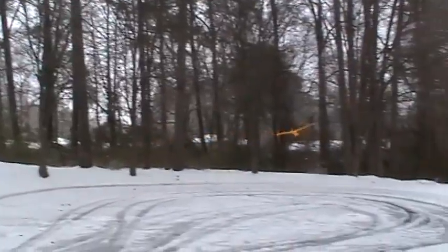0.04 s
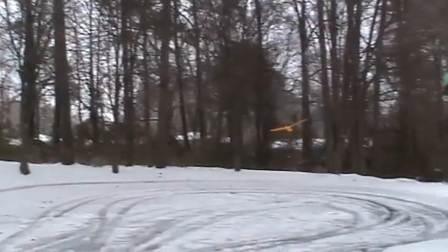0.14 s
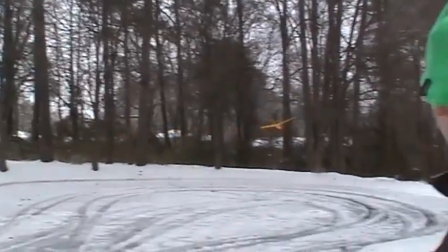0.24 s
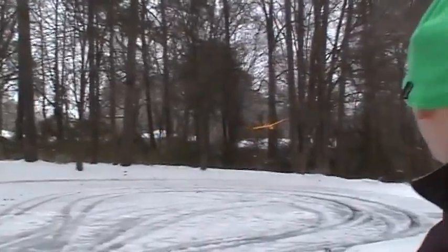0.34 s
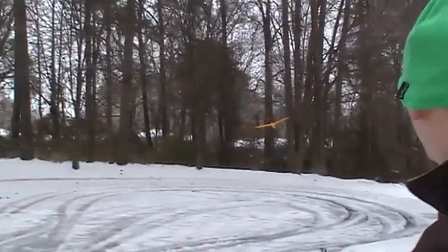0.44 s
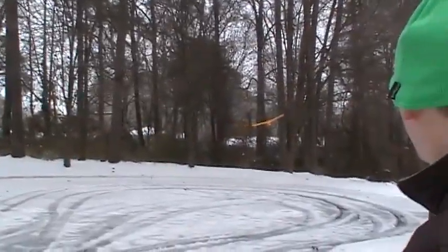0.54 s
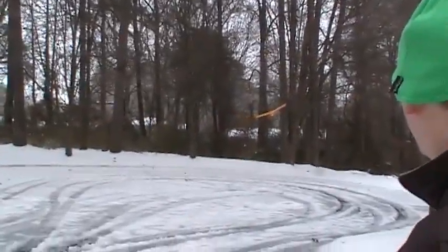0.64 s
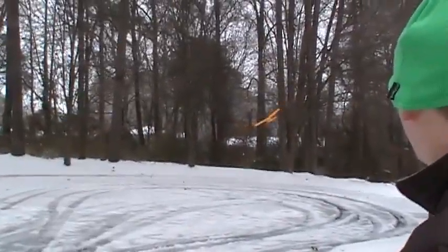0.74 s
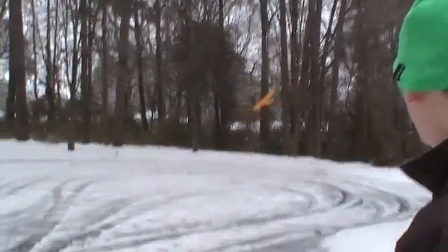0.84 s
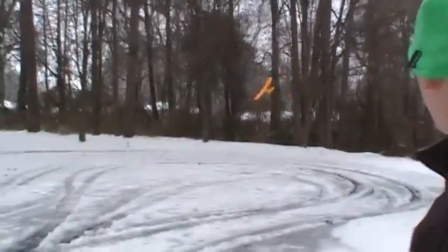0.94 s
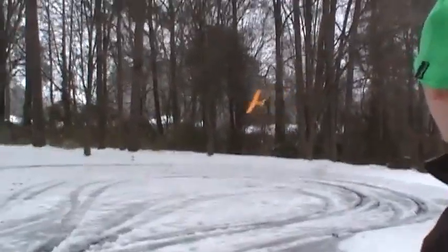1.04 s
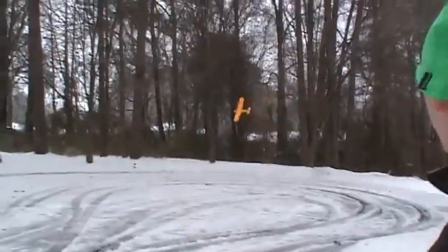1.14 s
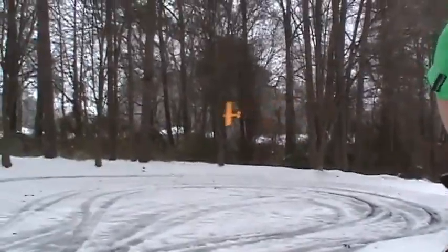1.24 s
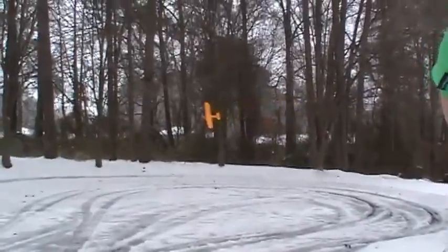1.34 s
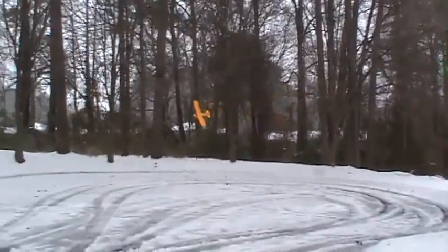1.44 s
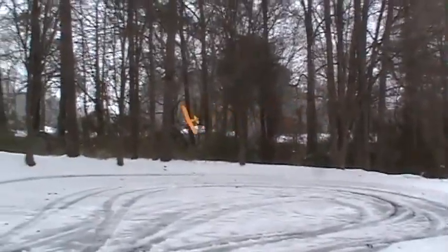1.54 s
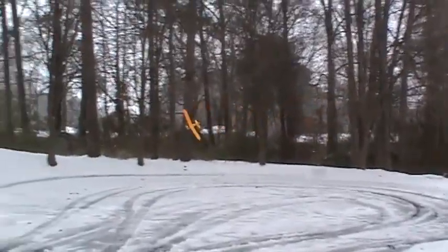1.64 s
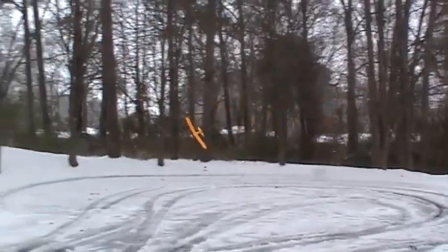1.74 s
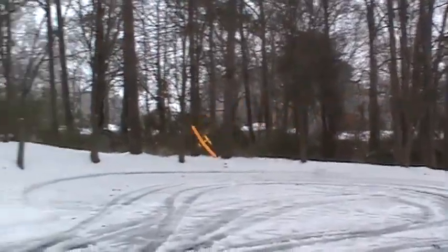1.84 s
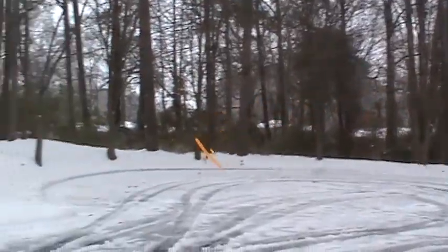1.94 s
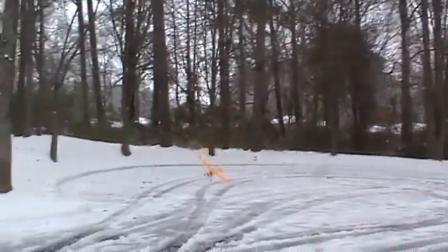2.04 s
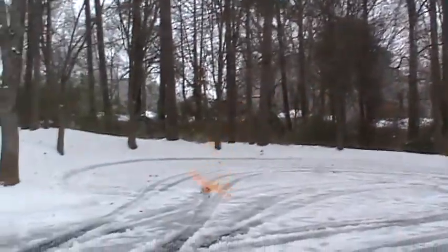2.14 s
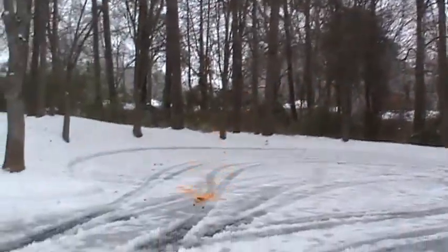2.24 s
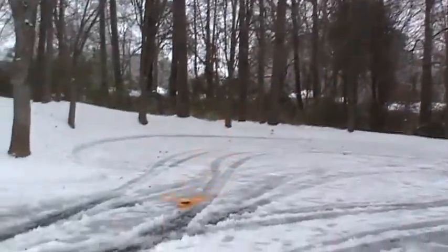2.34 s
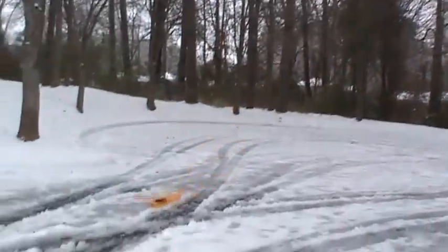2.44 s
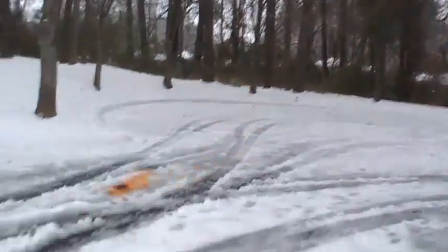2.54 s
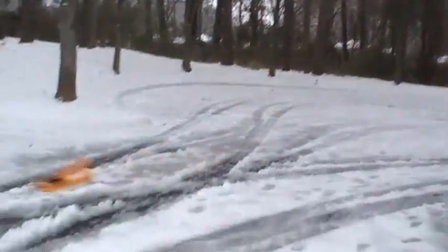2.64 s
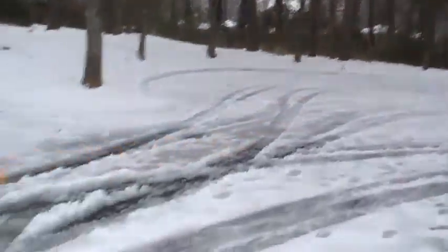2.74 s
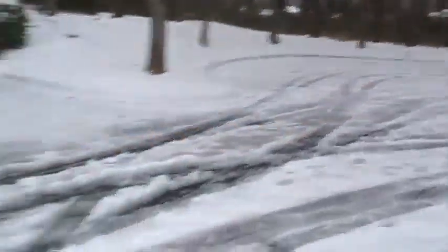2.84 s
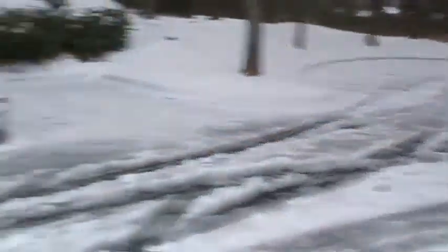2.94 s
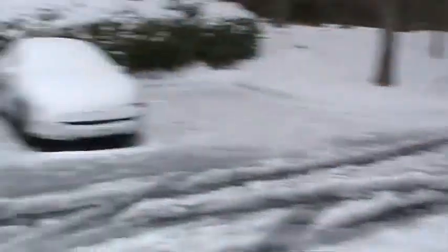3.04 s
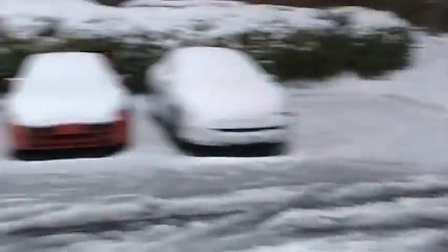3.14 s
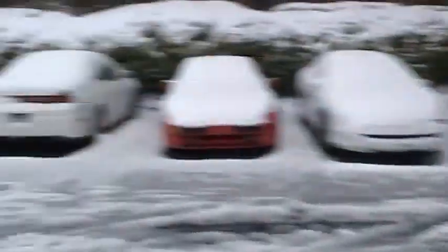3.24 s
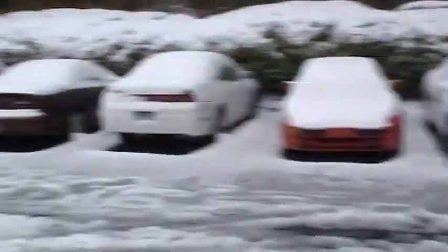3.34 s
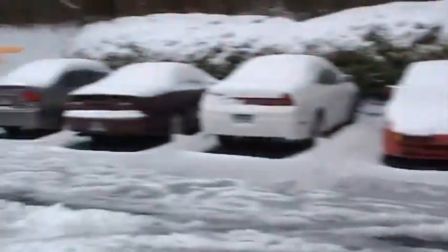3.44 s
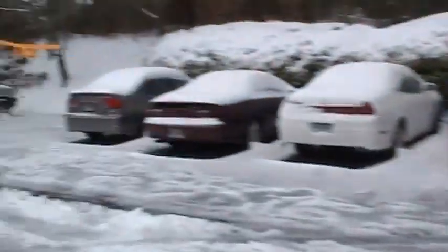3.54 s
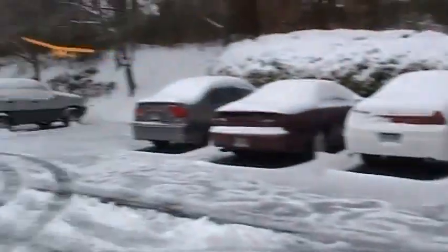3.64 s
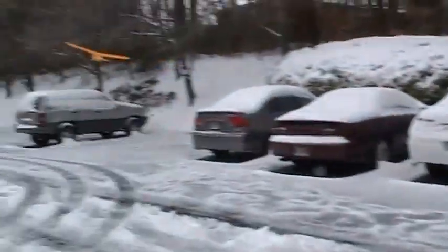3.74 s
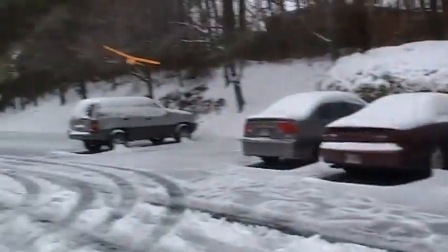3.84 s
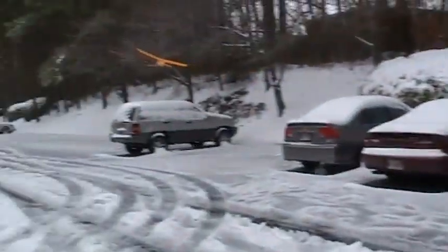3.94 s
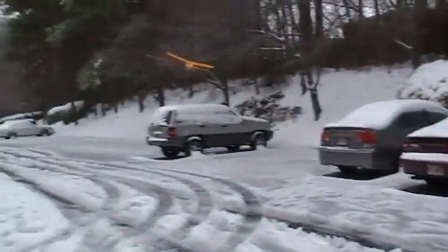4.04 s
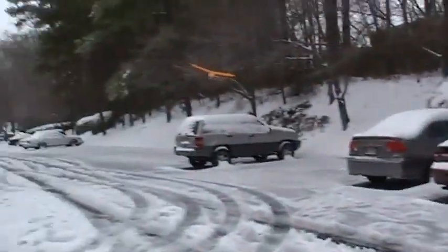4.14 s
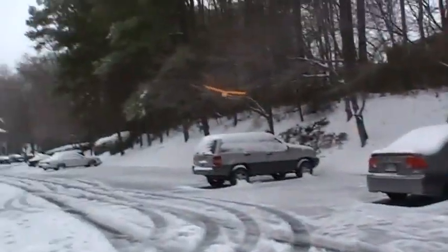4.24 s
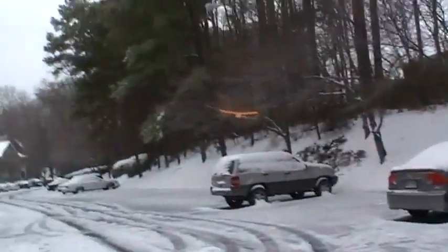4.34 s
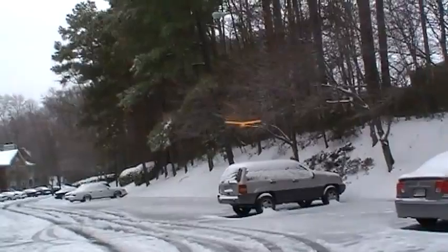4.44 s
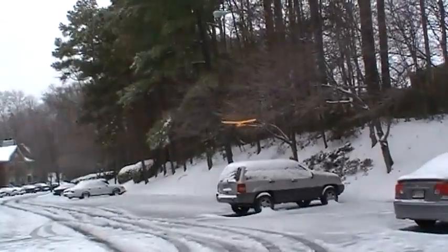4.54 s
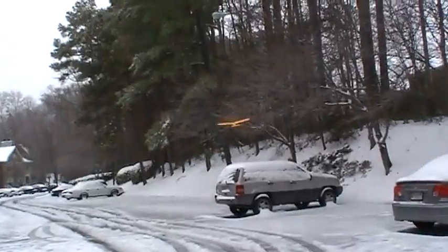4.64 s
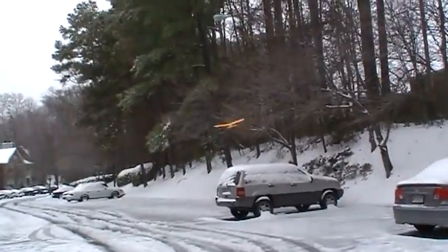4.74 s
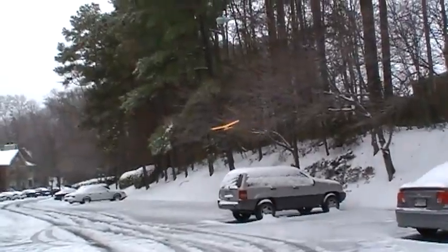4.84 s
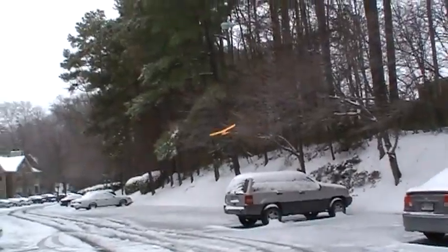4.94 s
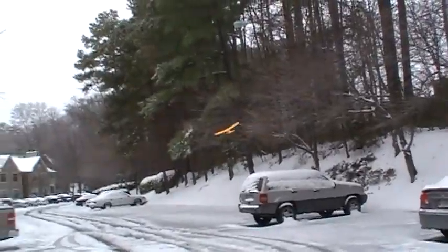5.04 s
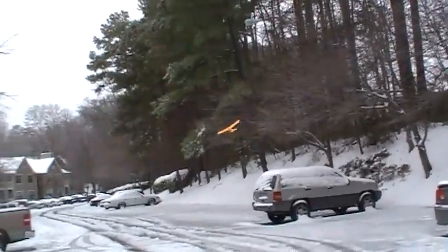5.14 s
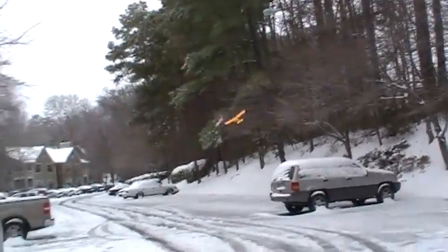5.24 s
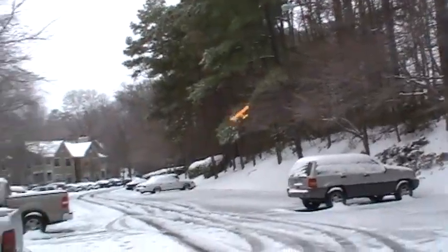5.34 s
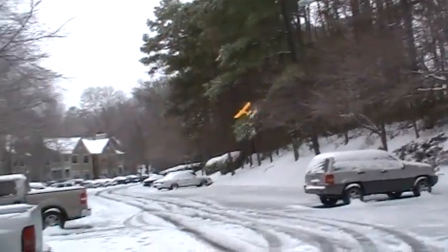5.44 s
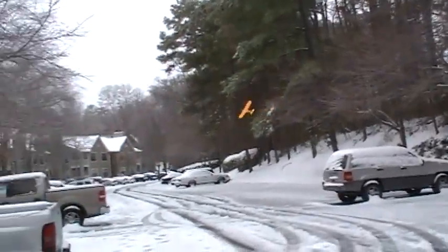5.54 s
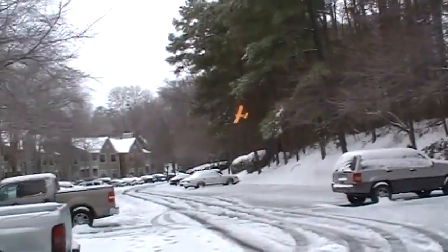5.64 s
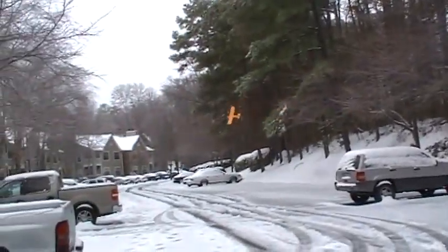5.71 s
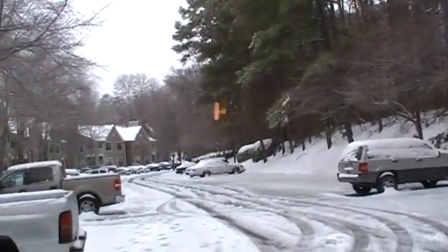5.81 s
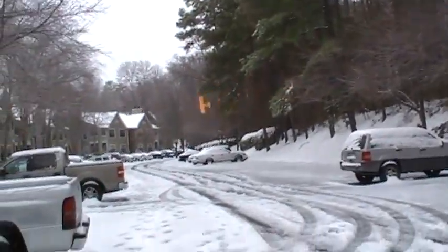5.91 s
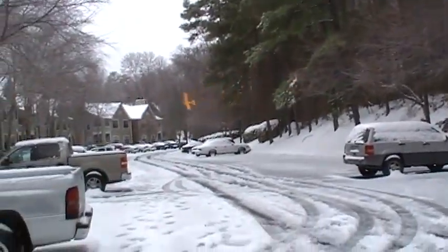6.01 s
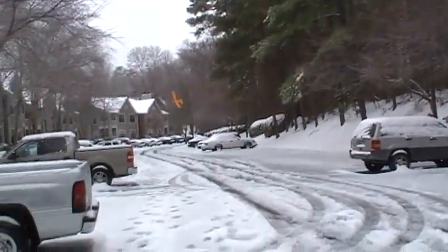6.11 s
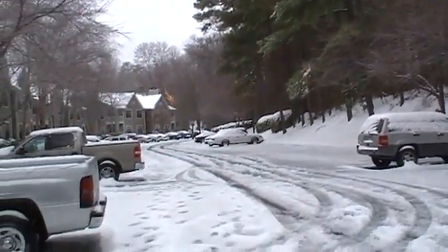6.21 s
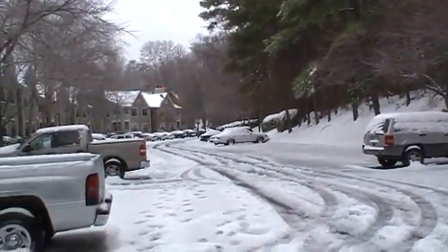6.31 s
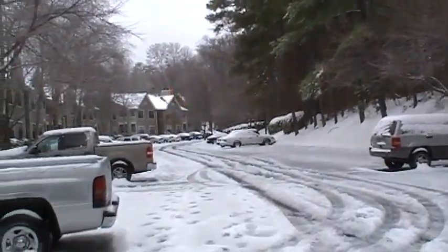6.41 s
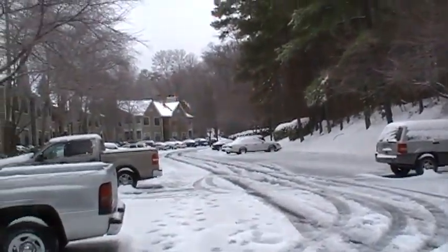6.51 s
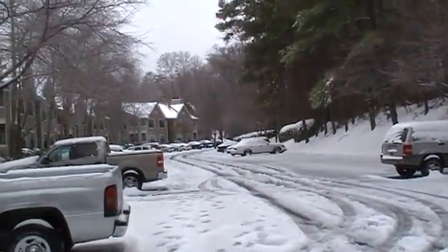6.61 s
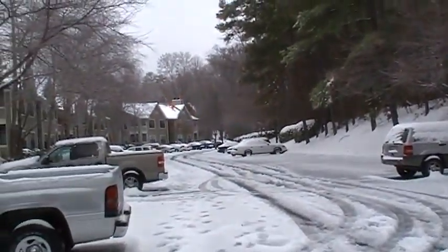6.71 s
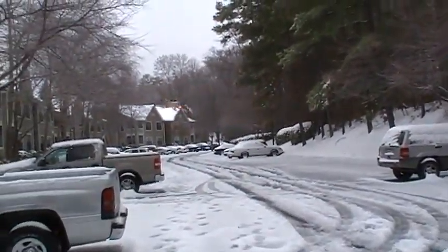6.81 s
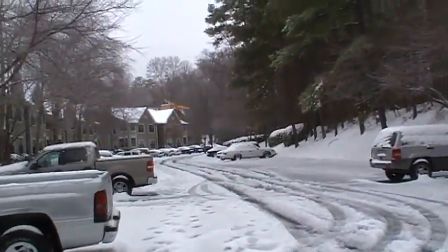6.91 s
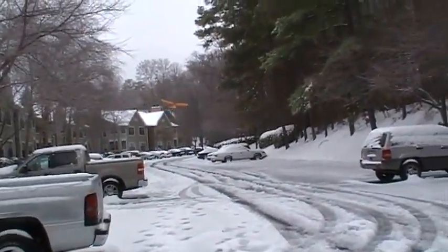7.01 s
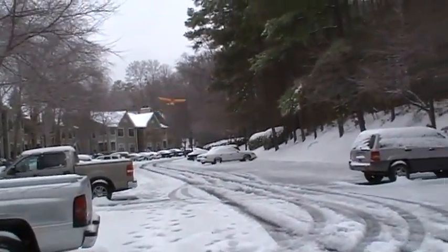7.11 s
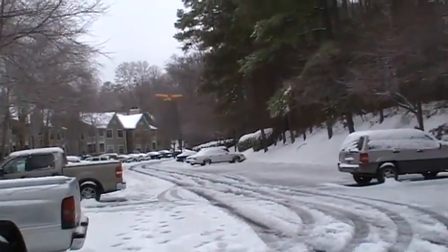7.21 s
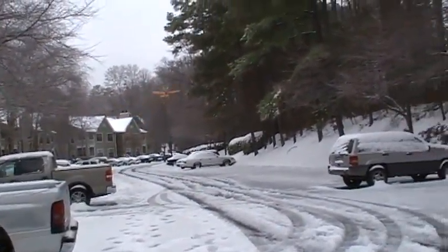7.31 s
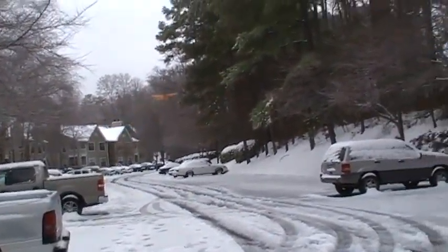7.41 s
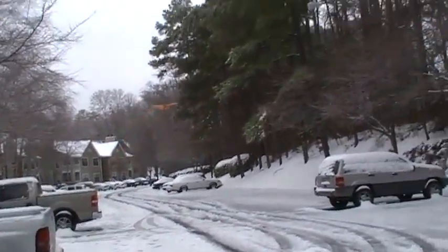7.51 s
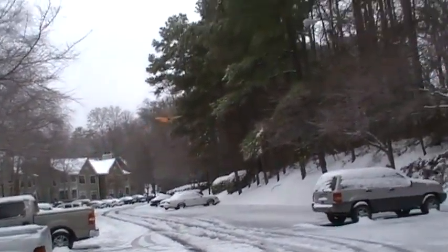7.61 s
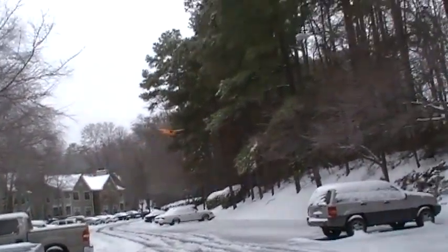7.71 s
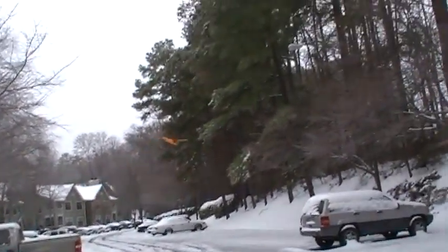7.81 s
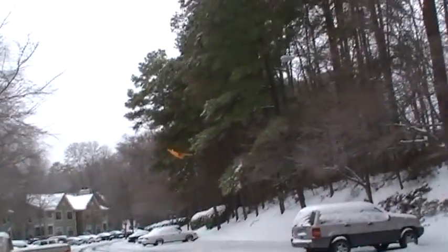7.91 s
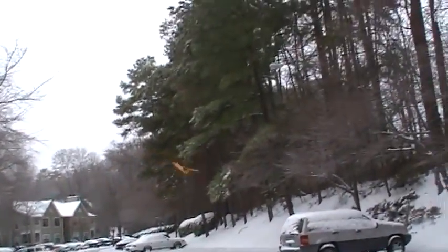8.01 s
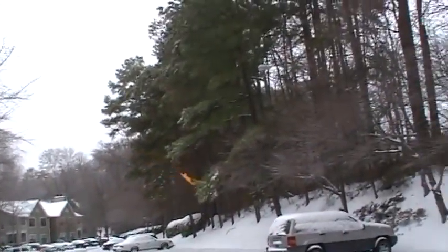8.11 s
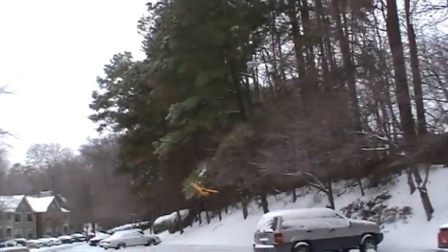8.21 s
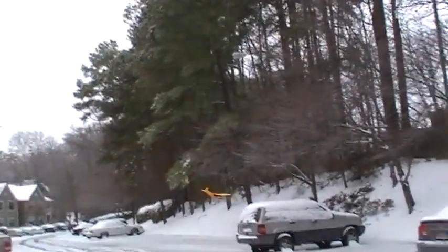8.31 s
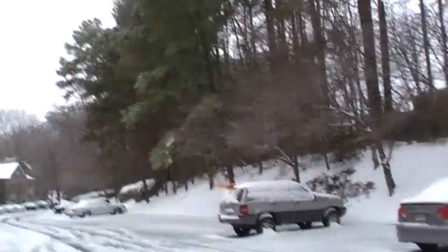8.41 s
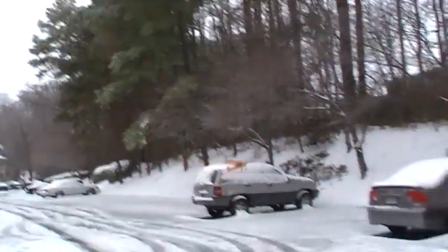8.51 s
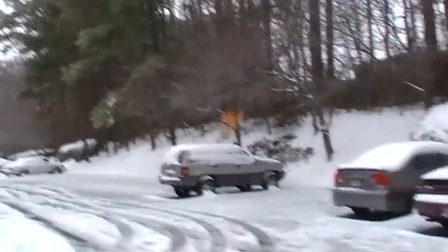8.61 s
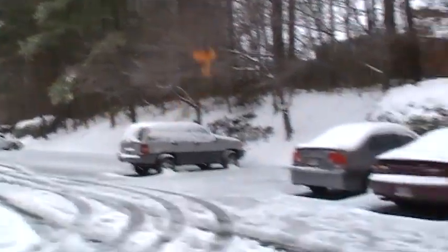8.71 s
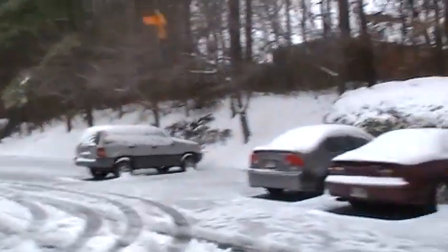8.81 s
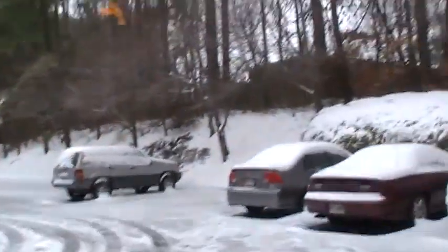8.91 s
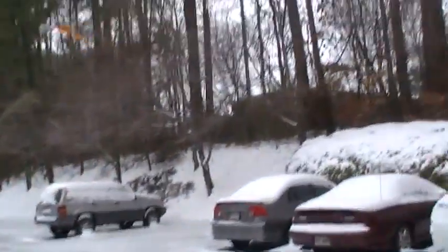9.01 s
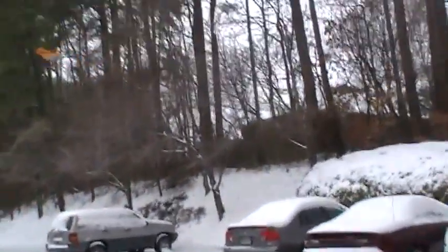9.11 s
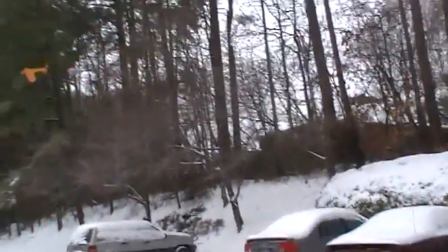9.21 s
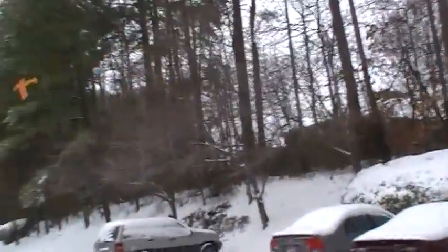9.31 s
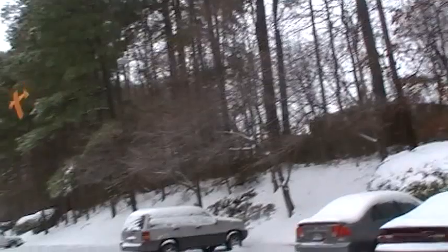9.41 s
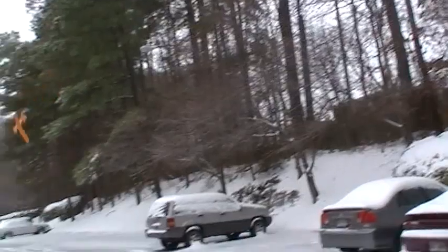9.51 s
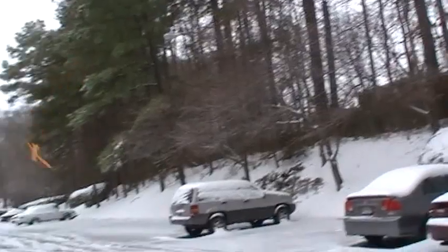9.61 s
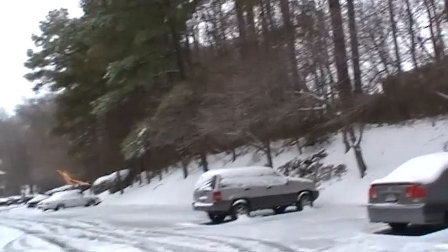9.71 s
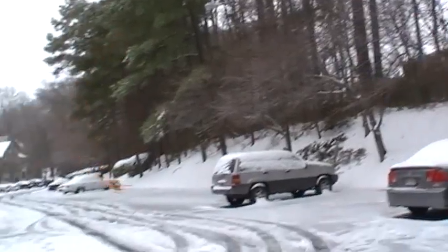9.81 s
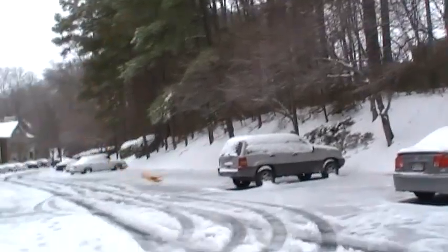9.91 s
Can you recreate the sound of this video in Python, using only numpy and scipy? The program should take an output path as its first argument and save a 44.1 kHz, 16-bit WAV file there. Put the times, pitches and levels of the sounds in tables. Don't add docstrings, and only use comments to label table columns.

```python
import sys
import numpy as np
from scipy import signal
from scipy.fft import rfft, irfft, next_fast_len
from scipy.io import wavfile
from scipy.ndimage import uniform_filter1d, map_coordinates

SR = 44100
rng = np.random.default_rng(int(sys.argv[2]) if len(sys.argv) > 2 else 0)


def store_wav(level_fs):
    pcm = np.round(np.clip(np.atleast_2d(level_fs), -1, 1) * 32767)
    wavfile.write(sys.argv[1], SR, pcm.T.astype(np.int16))


def elevation(decibels):
    levels = np.asarray(decibels, float)
    return 10 ** (levels / 20)


N = 439236


def unit(x):
    return x / np.sqrt(np.mean(x ** 2) + 1e-20)


def along(points, hz):
    f, v = np.transpose(points)
    return np.interp(np.log(hz + 1), np.log(f + 1), v)


def curves(rows):
    s, *cols = np.transpose(rows)
    return [np.interp(np.arange(N) / SR, s, c) for c in cols]


def swells(rows):
    s, half, *heights = np.transpose(rows)
    t = np.arange(0, N / SR + .01, .01)
    bells = np.exp(-((t[:, None] - s) / half) ** 2)
    return curves(np.column_stack([t, bells @ np.transpose(heights)]))


def wobble(rate):
    knots = rng.standard_normal(int(N * rate / SR) + 4)
    return map_coordinates(knots, [np.arange(N) * rate / SR], order=1)


def filtered(x, response):
    m = next_fast_len(x.shape[-1] + 8192)
    return irfft(rfft(x, m) * response(np.fft.rfftfreq(m, 1 / SR)), m)[..., :x.shape[-1]]


def coloured(x, spectrum):
    return unit(filtered(x, lambda hz: elevation(along(spectrum, hz))))


def patches(shape, tall, long):
    field = uniform_filter1d(rng.standard_normal(shape), tall, axis=0)
    return unit(uniform_filter1d(uniform_filter1d(field, long, axis=1), long, axis=1))


def ring(x, centre_hz, width_hz, db):
    body = filtered(x, lambda f: 1j * f * width_hz / (centre_hz ** 2 - f * f + 1j * f * width_hz))
    return elevation(db) * body / np.abs(body).max()


# pitch_hz, level_db
TRAFFIC = [(15, -81), (25, -33), (106, -12.5), (140, -6), (213, -3.5), (438, -3), (958, -2), (1100, -7.5),
           (1400, -5.5), (3000, -11), (3900, -5.5), (6600, -120)]
# pitch_hz, likeness
TRAFFIC_ALIKE = [(60, 0.96), (200, 0.78), (500, 0.24), (2000, 0.024)]


def town():
    turn = lambda hz: np.arccos(np.clip(along(TRAFFIC_ALIKE, hz), -1, 1)) / 2
    shares = lambda hz: elevation(along(TRAFFIC, hz)) * [np.cos(turn(hz)), np.sin(turn(hz))]
    mid, side = filtered(rng.standard_normal((2, N)), shares)
    drone = unit(filtered(rng.standard_normal(N), lambda hz: 1 / (1 + ((hz - 109) / 5) ** 2)))
    hum = elevation(-53 + 0.32 * wobble(2.84)) * unit(np.array([mid + side, mid - side]))
    return hum + elevation(-70.0) * drone * elevation([[.5], [-.5]])


# pitch_hz, level_db
WIND = [(15, -30), (40, -3), (80, -1), (150, -7), (300, -25), (600, -120)]
# centre_s, half_length_s, rise_db
BREEZE_PUFFS = [
    (3.47, 0.11, 18.5),
    (3.68, 0.16, 28),
    (4.36, 0.055, 25.4),
    (4.5, 0.094, 19),
]
STILL_AIR_DB = -86.5


def breeze():
    across, each = coloured(rng.standard_normal((2, N)), WIND)
    return elevation(STILL_AIR_DB + swells(BREEZE_PUFFS)[0]) * (across * [[1.2], [-1]] + 0.18 * each)


# start_s, peak_db, centre_hz, width_hz, t60_s
FINGER_TAPS = [
    (3.85, -34, 701, 900, 0.19),
    (3.869, -36, 300, 400, 0.42),
    (5.269, -34.5, 1780, 398, 0.046),
    (5.28, -32.5, 1790, 702, 0.047),
    (5.283, -34, 503, 1200, 0.24),
]
# centre_hz, width_hz, peak_db
CLICK_MODES = [(3100, 1500, -23), (6000, 2000, -23.5), (8800, 1200, -25)]
CLICK_S, TAP_RISE_S = 4.93732, 0.0074


def taps():
    out, t = np.zeros((2, N + SR)), np.arange(SR // 6) / SR
    for s, db, centre_hz, width_hz, t60 in FINGER_TAPS:
        rub = rng.standard_normal((2, len(t))) + rng.standard_normal(len(t))
        burst = elevation(-60 * t / t60) * np.clip(t / TAP_RISE_S, 0, 1) * rub
        out[:, round(s * SR):][:, :len(t)] += ring(burst, centre_hz, width_hz, db)
    click = sum(ring(np.exp(-t * 2e4), *mode) for mode in CLICK_MODES)
    out[:, round(CLICK_S * SR):][:, :len(t)] += click
    return out[:, :N]


def trees(x):
    t = np.arange(SR // 3) / SR
    tail = rng.standard_normal((2, len(t))) * elevation(-60 * t / 0.49) * (t > .012)
    tail[:, round(.062 * SR)] += 9
    return signal.fftconvolve(x[None], tail / np.linalg.norm(tail[0]), axes=1)[:, :N]


# start_s, high_hz, low_hz, level_db, held_end_db
CALLS = [(.705, 1576, 1160, -45, -18), (1.78, 1556, 1089, -47.5, -5), (2.154, 1580, 1188, -50, -14),
         (3.08, 1434, 1086, -44, 0.5), (3.99, 1412, 960, -45, -7), (4.872, 1450, 1010, -43, -1.5),
         (6.009, 1429, 1008, -45, -1.5), (6.866, 1368, 1079, -50.5, 2), (7.242, 1533, 1147, -46, -5),
         (8.04, 1552, 1110, -44, -2.5), (9.016, 1392, 992, -47, -13), (9.394, 1434, 1046, -47.5, -5)]
# high_hz, level_db
CALL_THROAT = [(1400, 9), (1560, 3)]
# start_s, from_hz, to_hz, length_s, level_db
HIGH_CHIPS = [
    (1.626, 6640, 9040, 0.037, -34),
    (9.18, 7000, 8490, 0.025, -41),
]


def birds():
    out, t = np.zeros(N + SR), np.arange(SR // 10) / SR
    drop = np.interp(t, [0, .024, .037, .042], [0, .06, .5, 1])
    for s, high_hz, low_hz, db, end_db in CALLS:
        turn = 2 * np.pi * np.cumsum(high_hz + (low_hz - high_hz) * drop) / SR
        draws = rng.standard_normal((2, len(t[::170])))
        leaves = elevation([np.interp(t, t[::170], 3.2 * draw) for draw in draws])
        first_db = np.interp(t, [0, .008, .03, .04, .045, .062, .09],
                             [-20, -2, -1, -12, end_db - 5, end_db - 8, end_db - 60])
        second_db = np.interp(t, [0, .014, .033, .04, .046, .062, .09],
                              [-30, -10, 0, -6, end_db - 3, end_db - 7, end_db - 50])
        low = leaves[0] * elevation(first_db) * np.sin(turn)
        upper = np.sin(2 * turn) + .25 * np.sin(3 * turn)
        upper = leaves[1] * elevation(along(CALL_THROAT, high_hz) + second_db) * upper
        out[round(s * SR):][:len(t)] += elevation(db - 1.4) * (low + upper)
    for s, from_hz, to_hz, length, db in HIGH_CHIPS:
        u = np.clip(t / length, 0, 1)
        turn = 2 * np.pi * np.cumsum(from_hz + (to_hz - from_hz) * u) / SR
        out[round(s * SR):][:len(t)] += elevation(db - 0.5) * np.sin(np.pi * u) * np.sin(turn)
    return out[:N]


# centre_s, half_length_s, rise_db
SERVO_MOVES = [
    (.86, .03, 24),
    (.95, .035, 28),
    (1.04, .045, 27),
    (1.17, .03, 23),
    (1.355, .045, 30),
    (1.42, .025, 28),
]
# pitch_hz, half_width_hz, level_db
SERVO_BOX = [(3280, 170, 0), (3700, 100, -1)]
SERVO_REST_DB, SERVO_TICKS_HZ = -72, 900


def servo():
    ticks = (rng.random(N) < SERVO_TICKS_HZ / SR) * rng.standard_normal(N)
    ticks = ticks + .06 * rng.standard_normal(N)
    case = lambda f: sum(elevation(db) / (1 + 1j * (f - hz) / half_hz) ** 2 for hz, half_hz, db in SERVO_BOX)
    return elevation(SERVO_REST_DB + swells(SERVO_MOVES)[0]) * unit(filtered(ticks, case))


def banked(x):
    z = signal.stft(x, nperseg=1024)[2]
    field_db = .5 * patches(z.shape, 30, 22) + 1.1 * patches(z.shape, 5, 8)
    return signal.istft(z * elevation(field_db), nperseg=1024)[1][:N]


# pitch_hz, level_db
RUSH_SPECTRUM = [(180, -58), (300, -70), (549, -14), (683, -8), (1340, -21.5), (2470, -13.5), (3200, -2),
                 (4160, -42), (7040, -120)]
RUSH_DB, RUSH_GROWS, RUSH_MASKED, MIDDLE_DB = -6.5, 0.021, 0.11, -48


def air_rush(near_db, nose_db, turn):
    rush_db = near_db + RUSH_DB + RUSH_GROWS * (near_db - MIDDLE_DB) - RUSH_MASKED * nose_db
    chop = 1 + 0.42 * np.cos(2 * turn)
    air = elevation(0.35 * wobble(9)) * chop * banked(coloured(rng.standard_normal(N), RUSH_SPECTRUM))
    return elevation(rush_db - 2.5) * air


PINION, GEAR = 8, 34
MESH_HUMPS = [(1.04, .26), (2.03, .14), (2.9, .28)]


def rattle(teeth):
    at = np.interp(np.arange(1, int(teeth[-1])), teeth, np.arange(N))
    k, left = np.arange(len(at)), at.astype(int)
    small = rng.standard_normal(PINION)[k % PINION]
    big = rng.standard_normal(GEAR)[k % GEAR]
    size = np.tanh(.08 * small + .35 * big + .3 * small * big + .55 * rng.standard_normal(len(k)))
    knocks = np.bincount(left, size * (left + 1 - at), N + 1)
    knocks = knocks + np.bincount(left + 1, size * (at - left), N + 1)
    shake = filtered(rng.standard_normal((3, N)), lambda hz: 1 / (1 + (hz / 260) ** 4))
    humps = sum(g * unit(s) * np.cos(2 * np.pi * n * teeth) for (n, g), s in zip(MESH_HUMPS, shake))
    return unit(knocks[:N]) + humps + .95 * rng.standard_normal(N)


# centre_s, half_length_s, centre_hz, half_width_hz,
# level_db
RATTLE_FLARES = [(.8, .2, 9150, 500, 9.5), (8.1, 0.45, 11100, 1190, 5), (2.5, 0.18, 9200, 900, 2),
                 (3.007, .055, 5700, 1200, 4.5), (3.2, 0.037, 6200, 1200, 6), (3.1, .04, 4500, 2500, -3),
                 (4.4, 0.56, 9200, 400, 3.5), (5.4, .11, 8800, 700, 9), (6.6, .35, 7540, 450, 5),
                 (7.95, 0.46, 7500, 700, 4), (8.55, .18, 7800, 499.8, 6), (8.719, .12, 4500, 700, 5)]


def flared(x):
    hz, t, z = signal.stft(x, SR, nperseg=512)
    gain_db = 0
    for s, half, mid_hz, half_hz, db in RATTLE_FLARES:
        gain_db = gain_db + db * np.exp(-((hz[:, None] - mid_hz) / half_hz) ** 2 - ((t - s) / half) ** 2)
    return signal.istft(z * elevation(gain_db), SR, nperseg=512)[1][:N]


# pitch_hz, level_db
FRAME_SPECTRUM = [(1350, -1.5), (2300, -6), (2530, -8.5), (3580, 1), (4180, 0), (4830, -4), (5280, -5.5),
                  (7110, -7), (8770, -11.5), (9980, -9.5), (12700, -22.5), (15800, -31.5)]


def airframe(near_db, nose_db, teeth):
    frame = banked(coloured(rattle(teeth), FRAME_SPECTRUM)) * elevation(0.99 * wobble(9) + 0.73 * wobble(22))
    frame = filtered(frame, lambda hz: 1 / (1 + (1500 / (hz + 1)) ** 4))
    low = filtered(frame, lambda hz: 1 / (1 + (hz / 7500) ** 8))
    sizzle = frame - low
    return flared(elevation(near_db + 2.0) * unit(low) + elevation(near_db + nose_db + 1.5) * unit(sizzle))


def lines(turn, orders, levels_db, fade_db):
    knots = np.linspace(0, N, 90)
    fades_db = [db + 4.5 + fade_db * rng.standard_normal(len(knots)) for db in levels_db]
    fades = [np.interp(np.arange(N), knots, elevation(db)) for db in fades_db]
    return sum(g * np.sin(k * turn + rng.uniform(0, 7.0)) for k, g in zip(orders, fades))


GEAR_SIDE_ORDERS = [33, 32, 31], [35, 36, 37, 38]
GEAR_SIDE_LEVELS = [0, -8, -13], [0, -5, -11, -12]
PINION_ORDERS = [29.75, 38.25, 37.25, 39.25, 40.25, 28.75, 25.5, 51]
PINION_LEVELS = [-4, -1, -7, -7, -9, -12, -14, -11]
OVERTONE_ORDERS = [42.5, 68, 67, 69, 66, 70, 63.75, 72.25, 102, 101, 97.75, 96.75]
OVERTONE_LEVELS = [-8, 1, -7, -5, -10, -11, -11, -12, -7, -8, -6, -7]
# centre_s, half_length_s, mesh_gain_db, overtone_gain_db, upper_over_lower_db
WHINE_BEAMS = [(.15, 0.28, 14, 1, -9), (.4, 0.14, 6, 3, 18), (.62, 0.11, 9, 5, 9), (1.75, 0.12, 3, 4, -22),
               (2.22, 0.21, 9, 14, -11), (2.55, 0.14, 4.5, -9, -8), (2.92, .13, 11.5, -5, -3),
               (3.2, 0.081, 0, -3, -8), (3.39, 0.15, 13.5, 13.5, -14), (3.85, 0.23, 9.5, -5, -16),
               (4.4, 0.38, 10.5, 2, -23), (5.1, 0.11, 9, 8, -10), (5.45, 0.17, 8, 7, 24),
               (6.03, 0.21, 15, -9, 0), (6.55, 0.11, 6, 4, -6), (7.06, 0.048, 9, -3, -7),
               (7.27, 0.21, 11, 1, -16), (7.62, 0.26, 13, 12, -1), (8.33, 0.12, 10.5, 10, 4),
               (8.62, 0.13, 16.5, 8, 10), (8.88, 0.088, 15.5, -17, 9), (9.1, 0.11, 9, 10, 6),
               (9.34, 0.12, 15.5, -1, 2), (9.75, 0.3, 8.5, 1, -12)]
# time_s, level_db
GEAR_RUNOUT = [(0, -5), (2.6, -3), (3, 0), (3.7, -4), (5.6, -3), (6.5, 5), (7.7, 2), (8.45, 0), (8.65, 7),
               (9.96, 5)]
MESH_DB, OVER_DB, SIDES_DB = -9, -14.5, -22
SIDES_SHARE = .55


def gear_whine(near_db, pinion_wobble_db, turn):
    beam_db, over_beam_db, lean_db = swells(WHINE_BEAMS)
    mesh_db = near_db + MESH_DB + beam_db
    over_db = near_db + OVER_DB + over_beam_db
    sides_db = near_db + SIDES_DB + curves(GEAR_RUNOUT)[0] + SIDES_SHARE * beam_db
    sides_db = sides_db + [[-.5], [.5]] * lean_db
    pinion_db = near_db + pinion_wobble_db
    whine = elevation(mesh_db + 4 + 1.6 * wobble(25))
    whine = whine * (1 + .3 * wobble(300)) * np.sin(GEAR * turn + .3 * wobble(300))
    for side_db, orders, levels_db in zip(sides_db, GEAR_SIDE_ORDERS, GEAR_SIDE_LEVELS):
        whine += elevation(side_db + 1 + 2 * wobble(30)) * lines(turn, orders, levels_db, fade_db=2)
    pinion_gain = elevation(pinion_db - 14 + 1.5 * wobble(20))
    whine += pinion_gain * lines(turn, PINION_ORDERS, PINION_LEVELS, fade_db=3)
    over_gain = elevation(over_db - 5.5 + 1.5 * wobble(20))
    whine += over_gain * lines(turn, OVERTONE_ORDERS, OVERTONE_LEVELS, fade_db=2.5)
    return filtered(whine, lambda hz: 1 / (1 + (hz / 10500) ** 8))


def glints(turn, rows):
    s, half, order, db = np.transpose(rows)
    t = np.arange(0, N / SR + .01, .01)
    power = elevation(2 * db) * np.exp(-2 * ((t[:, None] - s) / half) ** 2)
    out = np.zeros(N)
    for k in np.unique(order):
        flutter = elevation(3 * np.interp(t, t[::2], rng.standard_normal(len(t[::2]))) - 1)
        size = flutter * np.sqrt(2 * power[:, order == k].sum(axis=1))
        out += np.interp(np.arange(N) / SR, t, size) * np.sin(k * turn + rng.uniform(0, 2 * np.pi))
    return out


# centre_s, half_length_s, shaft_order, level_db
GLINTS_LOW = [(0.4, 0.65, 19.25, -70), (0.93, 0.16, 21.25, -61), (1.25, 0.65, 15.25, -71),
              (1.3, 0.2, 23.0, -61), (1.3, 0.65, 22.0, -67), (1.06, 0.09, 20, -61), (1.45, 0.65, 11.5, -70),
              (2.65, 0.65, 9.25, -64), (2.7, 0.65, 6.25, -61), (3.22, 0.08, 14.75, -57),
              (2.75, 0.65, 4.25, -64), (2.85, 0.22, 22.0, -56), (2.85, 0.65, 22.0, -55),
              (3.1, 0.4, 8.5, -62), (2.98, 0.1, 14.75, -55), (3.25, 0.65, 3.0, -66), (3.4, 0.65, 6.25, -62),
              (3.5, 0.65, 18.0, -58), (4.45, 0.65, 18.0, -70), (5.75, 0.65, 10.0, -70),
              (5.85, 0.65, 15.0, -71), (7.95, 0.65, 12.75, -68), (8.45, 0.65, 13.75, -65),
              (8.5, 0.22, 11.5, -62), (8.5, 0.65, 4.25, -67), (8.5, 0.65, 14.75, -65),
              (8.55, 0.65, 11.5, -62), (8.65, 0.65, 6.0, -64), (8.65, 0.65, 25.5, -62),
              (8.9, 0.65, 19.0, -65)]
# centre_s, half_length_s, shaft_order, level_db
GLINTS_SIDE = [(0.2, 0.15, 33, -56), (0.52, 0.32, 35, -52), (1.12, 0.32, 36, -60), (1.36, 0.32, 33, -60),
               (2.56, 0.32, 33, -50), (2.96, 0.22, 36, -44), (3.04, 0.32, 35, -43), (3.04, 0.32, 38, -50),
               (3.32, 0.15, 37, -49), (3.44, 0.32, 33, -46), (3.48, 0.1, 32, -52), (3.52, 0.1, 38, -50),
               (3.64, 0.32, 31, -54), (4.28, 0.32, 33, -56), (5.04, 0.32, 33, -60), (5.4, 0.22, 35, -57),
               (5.68, 0.22, 36, -60), (6.24, 0.32, 35, -56), (6.4, 0.32, 38, -59), (6.56, 0.32, 33, -55),
               (7.56, 0.32, 33, -50), (7.6, 0.32, 35, -56), (7.92, 0.1, 38, -53), (8.28, 0.1, 35, -49),
               (8.52, 0.32, 33, -48), (8.56, 0.32, 32, -49), (8.6, 0.32, 37, -57), (8.86, 0.06, 33, -40),
               (8.72, 0.08, 36, -45), (8.9, 0.16, 35, -41), (9.08, 0.32, 33, -43), (9.44, 0.15, 35, -51),
               (9.72, 0.32, 33, -51)]
# centre_s, half_length_s, shaft_order, level_db
GLINTS_PINION = [(0.96, 0.32, 42.5, -58), (1.88, 0.32, 42.5, -60), (2.72, 0.15, 39.25, -49),
                 (2.84, 0.07, 40.25, -47), (2.88, 0.1, 42.5, -45), (2.96, 0.07, 38.25, -46),
                 (2.96, 0.32, 29.75, -49), (3.08, 0.22, 43.5, -50), (3.24, 0.32, 38.25, -44),
                 (3.24, 0.32, 42.5, -43), (3.28, 0.15, 40.25, -49), (3.36, 0.1, 37.25, -47),
                 (3.36, 0.15, 39.25, -45), (3.44, 0.07, 42.5, -50), (3.88, 0.32, 38.25, -57),
                 (4.08, 0.32, 42.5, -59), (5.36, 0.1, 39.25, -55), (5.48, 0.22, 38.25, -54),
                 (5.6, 0.24, 29.75, -58), (6.24, 0.15, 29.75, -58), (6.44, 0.32, 38.25, -55),
                 (7.56, 0.32, 37.25, -58), (7.64, 0.32, 39.25, -59), (7.84, 0.32, 42.5, -59),
                 (7.88, 0.1, 40.25, -52), (7.88, 0.32, 29.75, -58), (7.96, 0.22, 38.25, -55),
                 (8.24, 0.1, 37.25, -51), (8.44, 0.1, 38.25, -53), (9.04, 0.32, 29.75, -54),
                 (9.12, 0.32, 42.5, -57), (9.28, 0.32, 40.25, -59), (9.32, 0.32, 38.25, -55)]
# centre_s, half_length_s, shaft_order, level_db
GLINTS_HIGH = [(0.55, 0.65, 67.0, -66), (0.55, 0.65, 69.0, -61), (0.65, 0.65, 68.0, -59),
               (0.75, 0.65, 102.0, -66), (1.2, 0.65, 70.0, -67), (1.5, 0.65, 98.75, -67),
               (1.55, 0.65, 56.0, -65), (1.55, 0.65, 66.0, -66), (2.2, 0.65, 68.0, -59),
               (2.25, 0.65, 107.25, -60), (2.35, 0.65, 69.0, -61), (2.4, 0.65, 67.0, -58),
               (2.9, 0.65, 68.0, -45), (2.95, 0.65, 69.0, -50), (3.0, 0.65, 102.0, -52),
               (3.05, 0.65, 54.0, -56), (3.1, 0.65, 51.0, -55), (3.3, 0.65, 101.0, -55),
               (3.35, 0.65, 73.25, -57), (3.35, 0.65, 97.75, -55), (3.45, 0.65, 68.0, -54),
               (3.45, 0.65, 80.75, -60), (3.65, 0.65, 63.75, -60), (3.7, 0.65, 103.0, -62),
               (4.25, 0.65, 96.75, -61), (4.6, 0.65, 63.75, -68), (4.7, 0.65, 80.75, -66),
               (4.7, 0.65, 97.75, -62), (5.0, 0.65, 72.25, -69), (5.05, 0.65, 101.0, -68),
               (5.1, 0.65, 102.0, -66), (5.15, 0.65, 96.75, -67), (5.2, 0.65, 103.0, -64),
               (5.35, 0.22, 103.0, -64), (6.45, 0.65, 99.0, -67), (6.65, 0.65, 75.25, -67),
               (6.7, 0.65, 101.0, -68), (6.8, 0.65, 68.0, -65), (7.5, 0.65, 96.75, -64),
               (8.5, 0.25, 68.0, -59), (8.85, 0.65, 103.0, -63), (8.95, 0.65, 69.0, -62),
               (9.0, 0.65, 67.0, -62)]
GLINT_LEVELS = [0.97, -0.49, -0.23, 1]


def panel_glints(turn):
    groups = (GLINTS_LOW, GLINTS_SIDE, GLINTS_PINION, GLINTS_HIGH)
    return sum(elevation(db) * glints(turn, rows) for db, rows in zip(GLINT_LEVELS, groups))


# time_s, mesh_hz
MOTOR_SPEED = [(0, 2820), (.22, 2933), (.5, 2951), (1.2, 2938), (1.5, 2951), (1.98, 3081), (2.62, 3115),
               (3.55, 3208), (4.68, 3224), (5.55, 3127), (6.2, 3384), (6.62, 3388), (7.35, 3482),
               (8.06, 3675), (8.54, 3902), (8.9, 3556), (9.36, 3216), (9.96, 2934)]
# centre_s, half_length_s, mesh_change_hz
MESH_BENDS = [
    (.73, 0.17, 88),
    (2.3, .2, -24),
    (3.1, 0.23, -145),
    (5.82, 0.19, 27),
    (6.99, .2, -91.5),
    (8.38, .17, 35),
    (8.72, .11, 27),
    (9.74, 0.19, 47.5),
]
# centre_s, half_length_s, mesh_change_hz
MESH_WAVERS = [(0.36, 0.13, -11), (0.6, 0.09, 12), (0.84, 0.09, -12), (1.32, 0.13, -5), (1.68, 0.09, -9),
               (1.96, 0.13, 16), (2.8, 0.3, -15), (3.4, 0.06, -14), (4.0, 0.06, 8), (4.52, 0.3, -4),
               (5.12, 0.13, 8), (5.36, 0.09, -6), (5.44, 0.3, 16), (5.6, 0.06, -8), (5.76, 0.06, 7),
               (5.96, 0.2, 12), (6.44, 0.2, -6), (7.24, 0.3, 13), (8.08, 0.2, -15), (8.68, 0.3, -28),
               (8.92, 0.06, -11), (9.48, 0.3, 20), (9.52, 0.06, 8), (9.64, 0.06, -7), (9.8, 0.06, 12),
               (9.96, 0.06, -19)]
INERTIA_S = .14


def motor():
    mesh_hz = uniform_filter1d(curves(MOTOR_SPEED)[0], round(INERTIA_S * SR), mode="nearest")
    mesh_hz = mesh_hz + swells(MESH_BENDS)[0] + swells(MESH_WAVERS)[0]
    return np.cumsum(mesh_hz * (1 + .0009 * wobble(40))) / SR


# time_s, nearness_db, nose_towards_db, pinion_wobble_db, left_over_right_db
FLIGHT_PATH = [(0, -48, 2.5, 1, 0), (.5, -48, -0.5, -4, 1), (1.5, -50, -1, 0, 2.5),
               (1.78, -47.5, 4.5, -29, 4), (2.05, -47.5, 5, -25, 1), (2.55, -40, 5, -20, 5),
               (2.8, -36, -4, -21, 11.5), (3.33, -38, -3.5, -7, 12.5), (3.55, -41, 2, -1, 9),
               (4.3, -48.5, -1, -19, 3), (5.1, -52, 1, -10, 4), (5.6, -52.5, -3, 3, 4.5),
               (6.3, -51.5, 0.5, -3, 6), (7.18, -52, 3.5, 4, 6.5), (8.13, -46.5, 3.5, -4, 4.5),
               (8.78, -41, -0.5, 0, 2), (9.38, -48, -3.5, -5, 11.5), (9.96, -47, 3, -22, 6.5)]


def plane():
    near_db, nose_db, wobble_db, _ = curves(FLIGHT_PATH)
    teeth = motor()
    turn = 2 * np.pi * teeth / GEAR
    whine = gear_whine(near_db, wobble_db, turn)
    noise = airframe(near_db, nose_db, teeth) + air_rush(near_db, nose_db, turn)
    return whine + panel_glints(turn), noise


# pitch_hz, share_of_difference
PORT_SHARES = [(300, 0.057), (1500, 0.5), (3000, 0.81), (8000, 0.48), (14000, 0.3)]


def heard(tones, noise):
    hz, t, z = signal.stft(np.array([tones, noise]), SR, nperseg=1024)
    pan_db = np.interp(t, np.arange(N) / SR, curves(FLIGHT_PATH)[3])
    half_db = along(PORT_SHARES, hz)[:, None] * pan_db / 2 + .8 * patches(z.shape[1:], 14, 9)
    lead = 0.076 * np.abs(pan_db) * np.clip(hz / 1900, 0, 1)[:, None] + 0.029
    scatter = np.tanh(0.49 * patches(z.shape[1:], 14, 9))
    scatter = (1.04 + 0.25 * np.clip(hz / 8000, 0, 1)[:, None]) * scatter
    leads = np.clip(lead + [.4 * scatter, scatter], -1.25, 1.25)
    pair = [elevation(side * half_db) * (z * np.exp(1j * side * leads)).sum(axis=0) for side in (1, -1)]
    return signal.istft(np.array(pair), SR, nperseg=1024)[1][:, :N]


ECHO_DB = -15


def scene():
    (tones, noise), song = plane(), birds()
    birdsong = song * elevation([[0], [-2]]) + elevation(ECHO_DB + 11) * trees(song)
    rest = elevation(ECHO_DB) * trees(tones + noise) + birdsong + taps() + town() + breeze()
    return heard(tones, noise + servo()) + rest


def roll_off(x):
    return signal.sosfilt(signal.butter(12, 16240, fs=SR, output="sos"), x)


def record(dry):
    mix = filtered(dry, lambda hz: (hz < 15800) / (1 + (35 / (hz + 1)) ** 2))
    return roll_off(mix)


dry = scene()
out = record(dry)
store_wav(out)
```